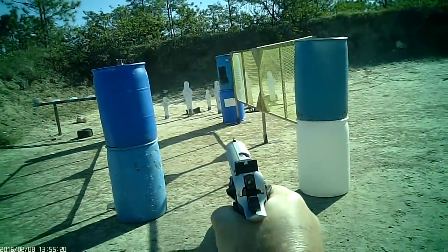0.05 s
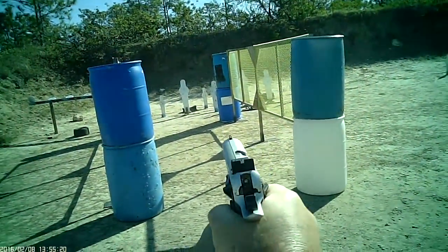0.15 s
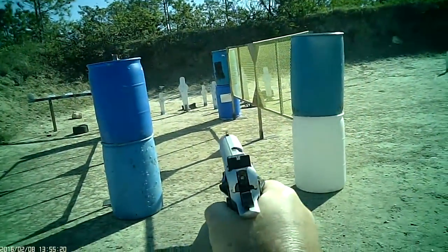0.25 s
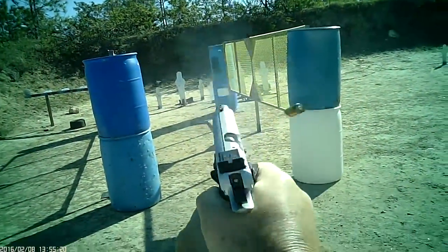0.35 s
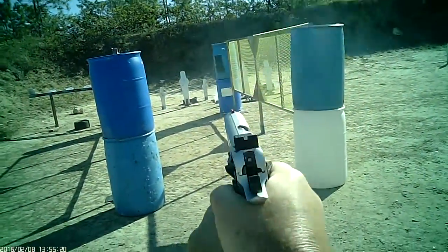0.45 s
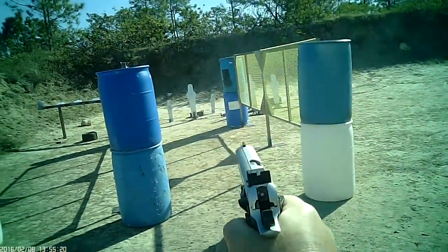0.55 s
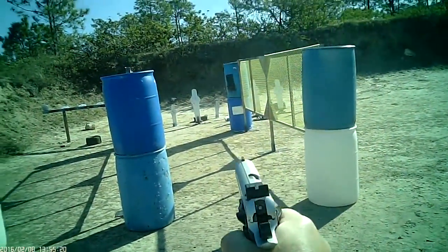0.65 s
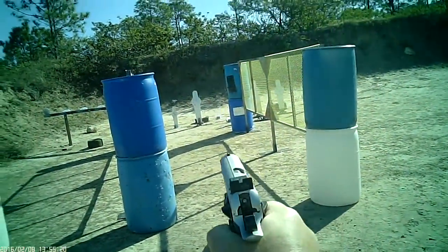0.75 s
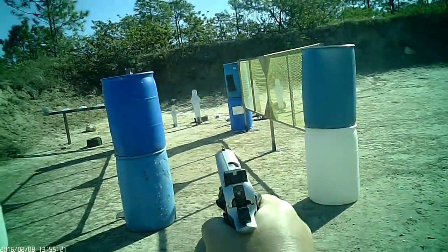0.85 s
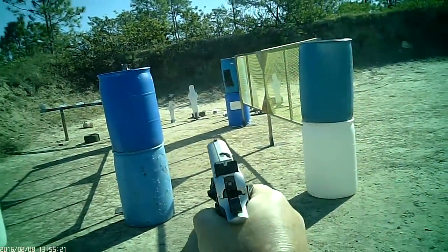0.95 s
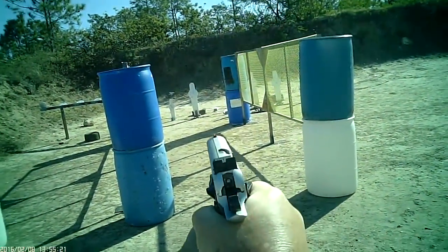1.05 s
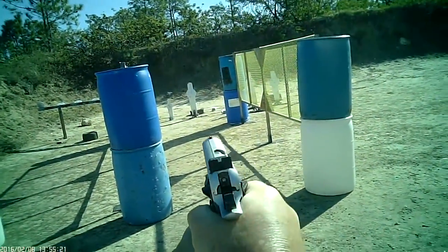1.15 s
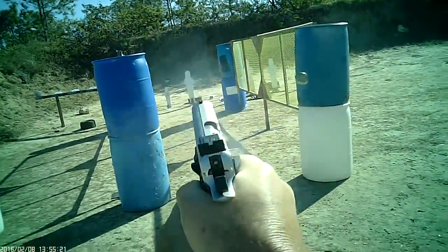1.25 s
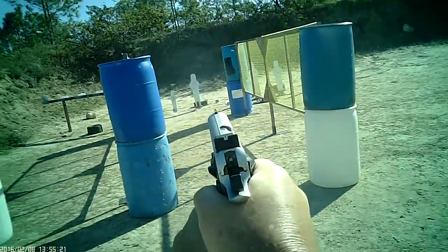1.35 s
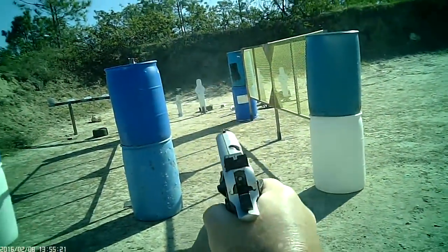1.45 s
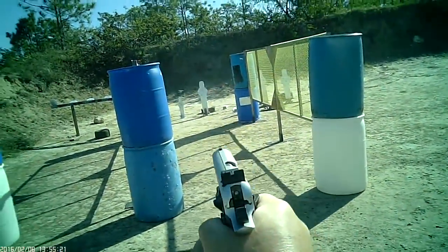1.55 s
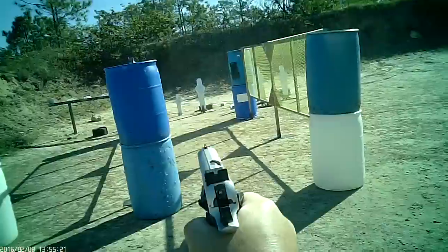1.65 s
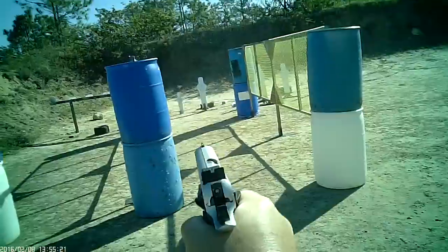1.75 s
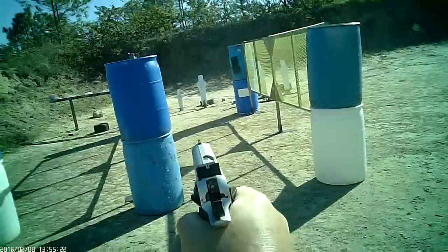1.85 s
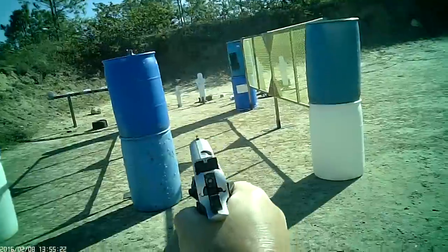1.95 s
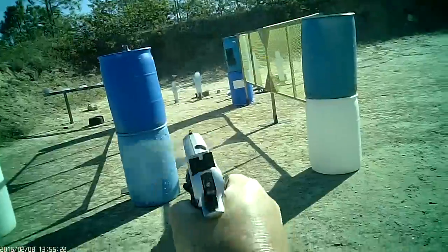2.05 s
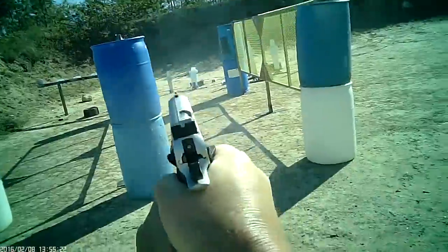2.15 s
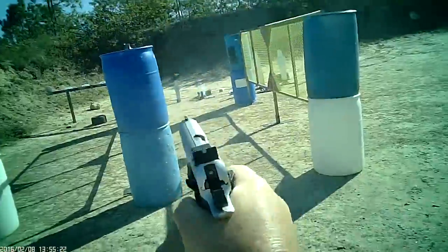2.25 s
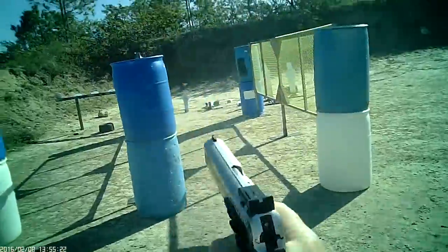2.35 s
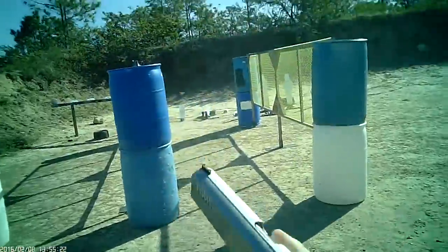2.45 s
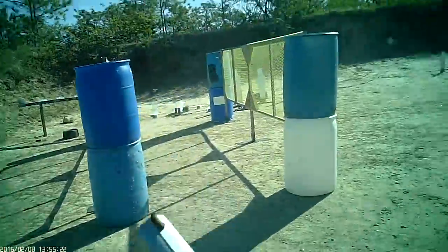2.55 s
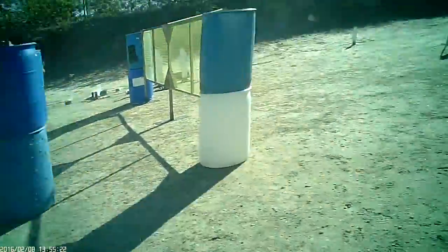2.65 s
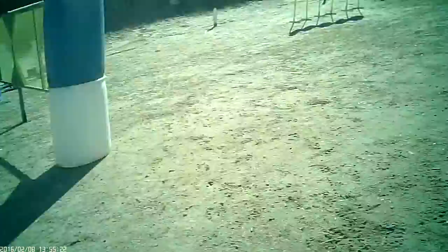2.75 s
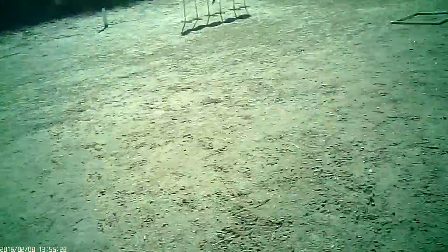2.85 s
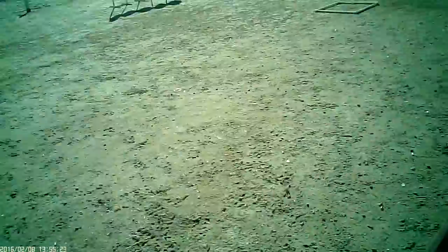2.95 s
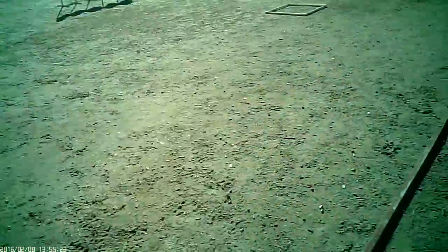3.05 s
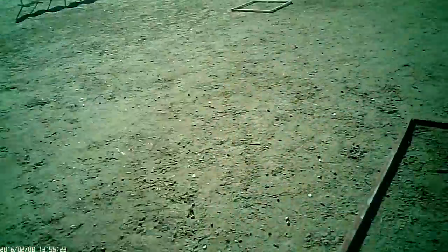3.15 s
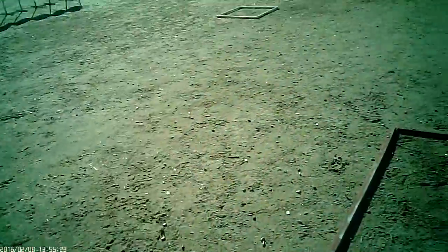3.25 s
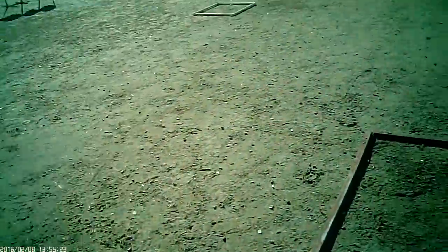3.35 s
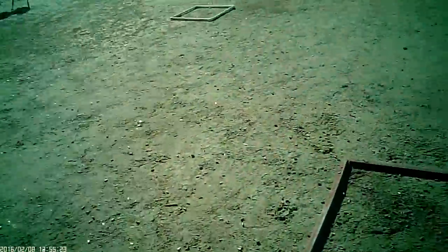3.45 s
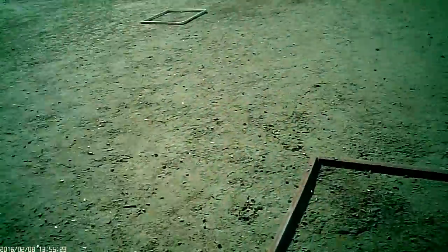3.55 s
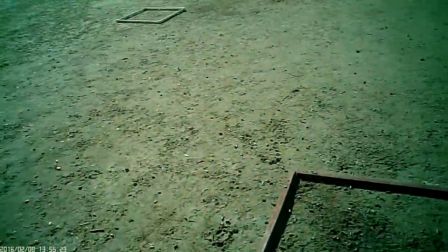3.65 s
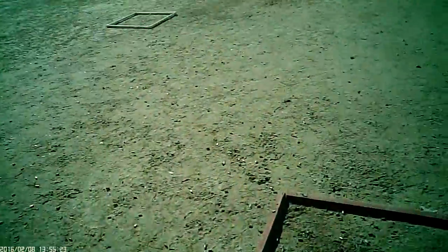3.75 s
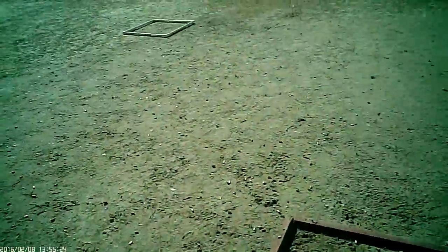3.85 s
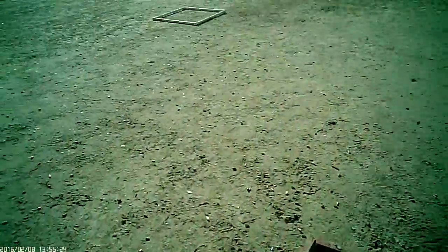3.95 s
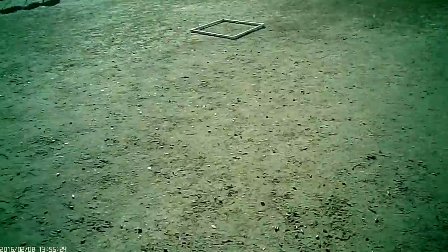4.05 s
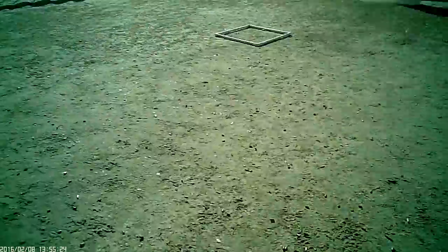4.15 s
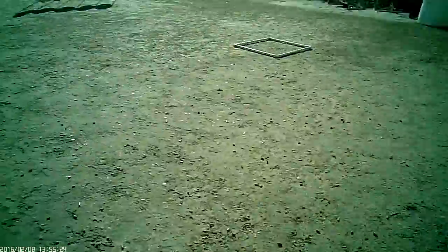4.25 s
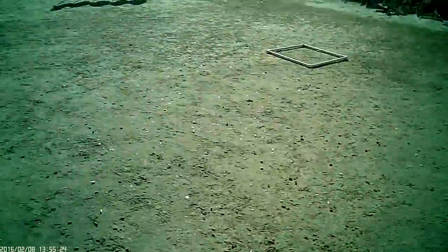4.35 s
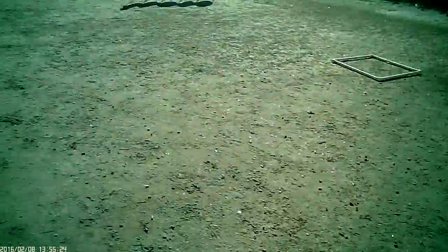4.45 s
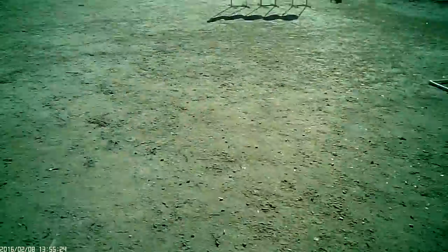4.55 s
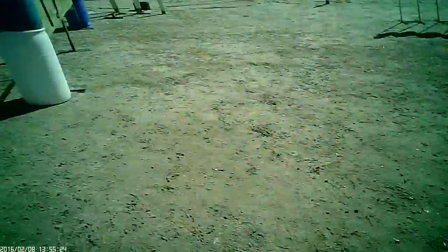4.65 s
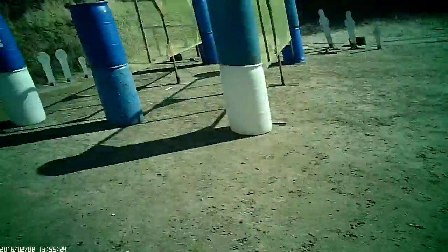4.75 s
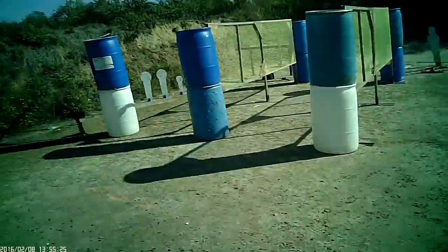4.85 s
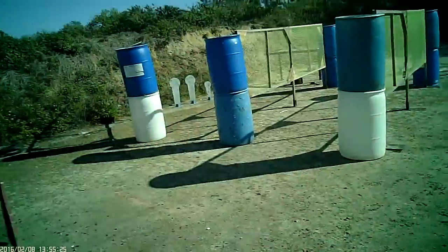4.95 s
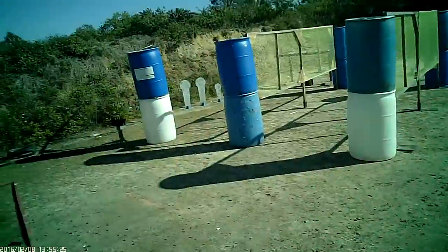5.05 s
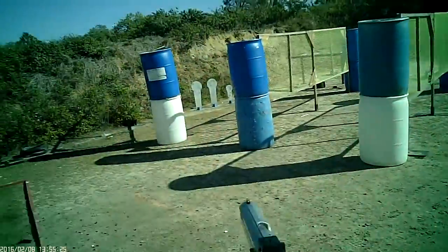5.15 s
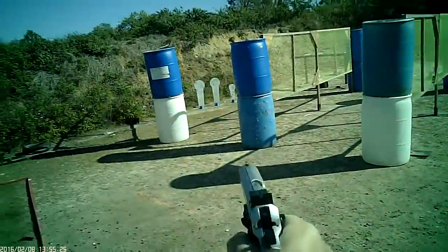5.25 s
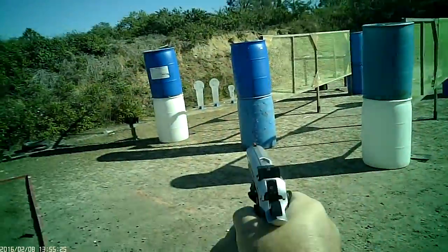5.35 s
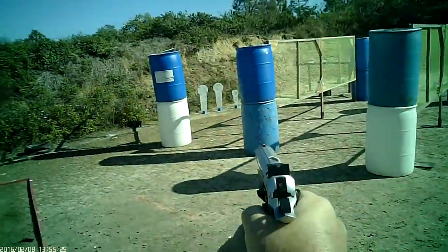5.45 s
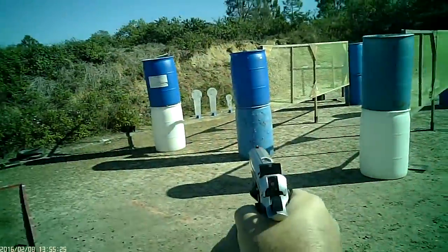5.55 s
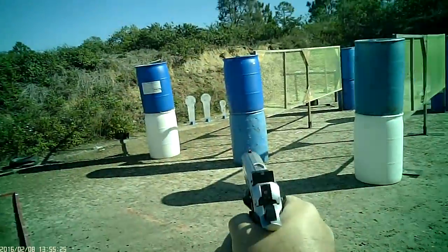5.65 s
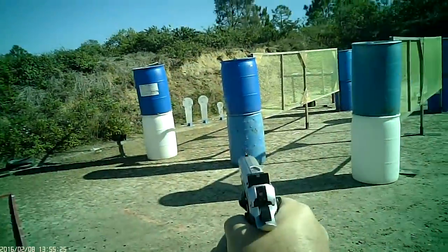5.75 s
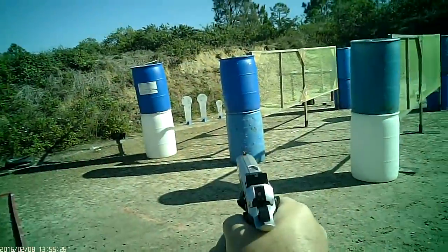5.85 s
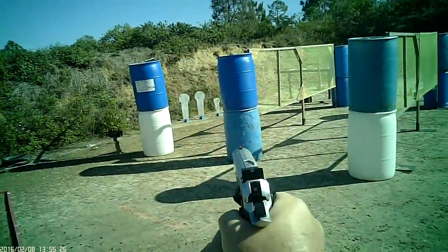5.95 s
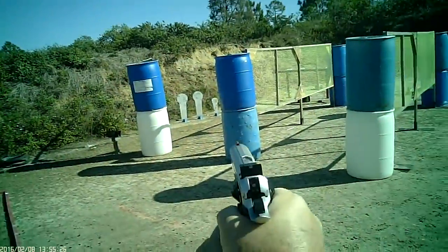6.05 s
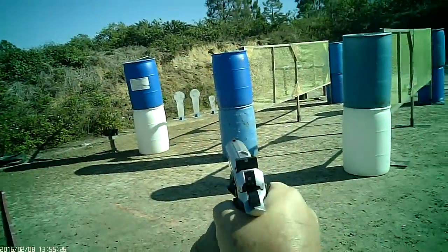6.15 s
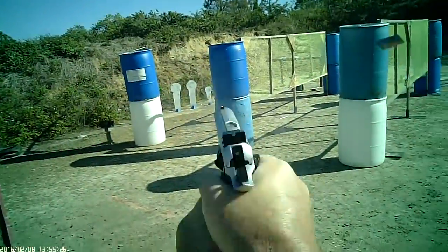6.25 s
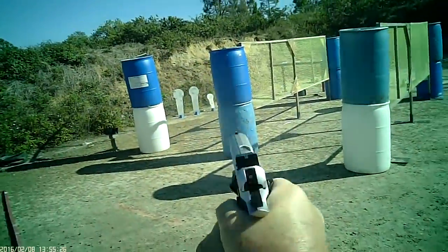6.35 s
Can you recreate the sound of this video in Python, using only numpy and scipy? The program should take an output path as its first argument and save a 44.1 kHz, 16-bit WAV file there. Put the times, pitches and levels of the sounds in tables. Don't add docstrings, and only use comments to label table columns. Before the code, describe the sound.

On an open dirt range in light wind, a pistol fires three times roughly a second apart. Each harsh blast echoes off drums and berm, and a bright steel clang follows almost at once. The first and third plates topple and clatter. Crunching steps fill a quieter gap before a fourth shot and metallic ring. The small head-worn microphone overloads and briefly ducks after each blast.

```python
import sys
import numpy as np
from scipy import signal
from scipy.fft import rfft, irfft, next_fast_len
from scipy.io import wavfile

SR = 44100
rng = np.random.default_rng(int(sys.argv[2]) if len(sys.argv) > 2 else 0)


def how_loud(loudness_db):
    steps = np.asarray(loudness_db, float) / 20
    return 10 ** steps


def transcribe(u):
    v = np.clip(np.atleast_2d(u).T, -1, 1)
    q = np.round(v * 32767).astype(np.int16)
    wavfile.write(sys.argv[1], SR, q)


N = 282681

# start in seconds, far echo in dB, stance (0 or 1), change of the late swell in dB.
SHOTS = [
    (0.361, -23.5, 0, 0),
    (1.246, -27.5, 0, -3),
    (2.0998, -22, 0, 2.5),
    (6.222, -22, 1, 0.1),
]
# start in seconds, peak in dB, ring against knock in dB,
# brightness in dB, pitch of the rap in Hz.
KNOCKS = [
    [(0.918, -28, -30, -40, 990), (0.925, -22.5, -8, -39, 1490), (0.9961, -28, -7.5, -6.5, 1570),
     (1.0544, -36, -14.5, -40, 1290), (1.0884, -32.5, -7, -36, 1320), (1.101, -45, -41, -30, 1680),
     (1.1075, -25, -23, -15, 1520), (1.1955, -31.5, -16.5, -33, 1420)],
    [(2.502, -36, -15, -47, 1550), (2.653, -34, -30, -2, 1420), (2.66, -22.5, -13.5, -5, 1490),
     (2.72, -49, -28, -30, 1420), (2.79, -39, -5.5, -32, 775), (2.867, -34, -7, -34, 880),
     (2.923, -29.5, -6, -42, 1470), (2.972, -18, -26, -45, 1490), (2.981, -24.5, -38, -45, 1560),
     (2.989, -31.5, -11, -40, 1600), (3.028, -48, -32, -40, 1700), (3.041, -30, -4.5, -34, 1490),
     (3.139, -28.5, -9, -39, 1550), (3.206, -25, -36, -35, 1580), (3.221, -30, -25, -38, 1620),
     (3.272, -38.5, -22, -27, 1530), (3.305, -38, -36.5, -30, 1230), (3.340, -42.5, -5, -35, 1500),
     (3.399, -44, -5, -44, 1600), (3.45, -36.5, -11, -18, 1500), (3.462, -44.5, -28, -20, 1620),
     (3.48, -40, -30, -22, 1480), (3.57, -45, -30, -24, 1580), (3.611, -41, -8.5, -18, 1710),
     (3.625, -40, -32, -22, 1370), (3.645, -44, -30, -20, 1390)],
]
# frequency in Hz, level in dB.
ECHO_COLOUR = [(60, -27.5), (150, -6.5), (400, -5), (900, 2), (1600, -1), (2300, -12.5), (5300, -16),
               (8000, -31), (16000, -55)]


def seconds(length):
    return np.arange(int(length * SR)) / SR


def add(out, piece, s):
    at = int(s * SR)
    out[at:at + len(piece)] += piece[:N - at]


def fade(t, t60):
    return how_loud(-60 * t / t60)


def coloured(spectrum, size):
    hz, db = np.transpose(spectrum)
    bins = np.linspace(1, SR / 2, size // 2 + 1)
    gain = how_loud(np.interp(np.log(bins), np.log(hz), db))
    x = irfft(rfft(rng.standard_normal(size)) * gain, size)
    return x / np.std(x)


def drift(rate, size):
    knots = rng.standard_normal(int(size / SR * 60) + 2)
    t = seconds(size / SR + 1)[:size]
    return np.interp(t * min(rate, 59), np.arange(len(knots)), knots)


def peak(x, hz, width, db):
    w, g = 2 * np.pi * hz / SR, how_loud(db / 2)
    q = np.pi * width / SR
    zeros = [1 + q * g, -2 * np.cos(w), 1 - q * g]
    poles = [1 + q / g, -2 * np.cos(w), 1 - q / g]
    return signal.lfilter(zeros, poles, x)


def resonance(x, hz, width):
    r = np.exp(-np.pi * width / SR)
    zeros = np.array([1, 0, -1]) * (1 - r * r) / 2
    return signal.lfilter(zeros, [1, -2 * r * np.cos(2 * np.pi * hz / SR), r * r], x)


def near(hz, mode_hz):
    return np.exp(-(np.log(hz / mode_hz) / .006) ** 2)


def ring(pitches, levels_db, t60, waver_db, length, hush=0.03, start=0, swings=()):
    t, out = seconds(length + 2 * hush), 0
    for hz, db, knots in zip(pitches, levels_db, rng.standard_normal((len(pitches), 80))):
        db = db + 3 * np.log2(hz / 1500)
        for s, mode_hz, lobe_db, half in swings:
            closeness = near(hz, mode_hz)
            if closeness > 1e-3:
                db = db + closeness * lobe_db * np.exp(-((t + start - s) / half) ** 2)
        turns = t * 18 * (1 + hz / 1e4)
        waver = how_loud(db + waver_db * (hz / 2500) ** .3 * np.interp(turns, np.arange(80), knots))
        beat_depth = np.clip(.04 * waver_db + hz / 2.5e4, 0, .9)
        beat = 1 + beat_depth * np.cos(2 * np.pi * (18 + 9 * knots[-2]) * t + 3 * knots[-3])
        muffled = np.clip((length - t) / hush + 2 - hz / 5000 + .25 * knots[-1], 0, 1) ** 2
        decay = fade(t, t60 * (1500 / hz) ** .27)
        out = out + waver * beat * muffled * decay * np.sin(2 * np.pi * hz * t)
    return out


def air():
    # frequency in Hz, level in dB per Hz.
    wind_colour = [(12, -13), (30, 0), (80, -2.5), (160, -10), (400, -15.5), (1000, -51)]
    rustle_colour = [(100, -9.5), (250, -9), (500, 3.5), (1400, 1.5), (2200, -7), (5000, -16), (12000, -34)]
    # centre in seconds, change in dB, half-length in
    # seconds.
    gusts = [
        (0, 5, 0.12),
        (.66, 14, 0.09),
        (1.52, -5, 0.094),
        (2.4, 13, 0.041),
        (2.68, 4, 0.3),
        (3.22, -2.5, 0.13),
        (3.43, 5, 0.071),
        (4.4, 2.5, 0.46),
        (5.851, -2, 0.23),
    ]
    t, size = np.arange(N) / SR, next_fast_len(N)
    gust_db = sum(db * np.exp(-((t - s) / half) ** 2) for s, db, half in gusts)
    wind = how_loud(-56 + gust_db + 0.53 * drift(6.3, N)) * coloured(wind_colour, size)[:N]

    floor_db, turn_db, linger_db, linger_t60_s = -61, -57.5, -33.5, 5
    turning = np.exp(-((t - 4.93) / 0.24) ** 2)
    power = how_loud(2 * floor_db) + how_loud(2 * turn_db) * turning
    knocked = np.zeros(N)
    for s, db, *_ in KNOCKS[0] + KNOCKS[1]:
        knocked[int(s * SR)] = how_loud(2 * (db + linger_db))
    power = power + signal.lfilter([1], [1, -fade(2 / SR, linger_t60_s)], knocked)
    rustle = np.sqrt(power) * how_loud(2.0 * drift(42, N)) * coloured(rustle_colour, size)[:N]
    return wind + rustle


def earlier_shot():
    # frequency in Hz, level in dB.
    last_modes = [(2536, -66), (2649, -62), (2859, -65), (3903, -68), (4958, -71)]
    out, t = np.zeros(N), seconds(1.4)
    add(out, how_loud(-48) * fade(t, 2.5) * coloured(ECHO_COLOUR, len(t)), 0)
    add(out, ring(*np.transpose(last_modes), t60=1.5, waver_db=1.5, length=0.3, hush=.05), 0)
    return out


def thumps():
    # start in seconds, peak in dB, pitch in Hz.
    blows = [(0.035, -34.5, 176), (.478, -15, 230), (0.573, -17, 366), (0.576, -17, 133), (0.691, -24, 278),
             (0.92, -21.5, 252), (2.215, -16, 260), (2.362, -15.5, 224), (2.495, -35, 250),
             (2.657, -29, 287), (2.794, -30.5, 213), (3.064, -37, 215), (3.433, -32.5, 185),
             (3.809, -38.5, 208), (3.855, -39, 148), (4.166, -42.5, 170), (4.498, -45, 154),
             (5.006, -37, 78.5)]
    out, t = np.zeros(N), seconds(.2)
    for s, db, hz in blows:
        add(out, how_loud(db) * np.sin(2 * np.pi * hz * t) * np.clip(t / 0.0013, 0, 1) * fade(t, 0.04), s)
    return out


def muzzle_blast():
    t = seconds(0.061)

    def pulse(centre, half, power=2):
        return np.exp(-((t - centre) / half) ** power)

    tones = 0.9 * np.sin(2 * np.pi * 6500 * t) + 0.66 * np.sin(2 * np.pi * 9500 * t)
    whistle = tones + 1.1 * rng.standard_normal(len(t))
    whistle = .9 * (.1 + (t / .0018) ** 2) * pulse(0, .003, 4) * whistle
    hz = 500 + 9000 * np.exp(-t / 0.0015)
    slide = np.sin(2 * np.pi * np.cumsum(hz) / SR + rng.uniform(0.012, 0.67))
    slide = 4.0 * pulse(.0034, .0012) * slide
    push = 1.6 * pulse(.0047, .001) + .3 * pulse(.0065, .0015)
    suction = 1.0 * pulse(.0113, .0024, 4) + .15 * pulse(.009, .001) + .4 * pulse(.0012, .0006)
    rebound = .2 * np.clip((t - .0135) / .002, 0, 1) * np.exp(-(t / .028) ** 3)
    bounce = 3.5 * pulse(.0099, .00025, 4)
    return whistle + slide + bounce + push - suction + rebound


def near_echoes(reflectors):
    t = seconds(0.36)
    scatter = .075 * rng.standard_normal(len(t)) * how_loud(5 * drift(59, len(t)))
    scatter = scatter * fade(t, .3) * (t > .004)
    clicks, high = .42 * scatter, .8 * scatter
    face_s, face_loss_db = .0017, 3
    for (s, db, depth, high_db), chance in zip(reflectors, rng.standard_normal((len(reflectors), 8))):
        face = np.arange(min(1 + int(max(depth, 0) / face_s), 8))
        uneven = .15 * chance[::-1][face] * (face > 0)
        at = ((s + face_s * (face + uneven)) * SR).astype(int)
        strength = how_loud(db - face_loss_db * face + 1.5 * chance[face])
        clicks[at] += strength
        high[at] += strength * how_loud(high_db)
    dulling = signal.butter(3, 2300, fs=SR, output="sos")
    dull, high = signal.sosfilt(dulling, [clicks, high])
    body = 26.1 * resonance(resonance(dull, 870, 520), 830, 950)
    body = body - 14.0 * resonance(resonance(high, 1600, 300), 1600, 660)
    body = body + 20.0 * resonance(dull, 430, 150)
    body = peak(body, 1230, 290, -7)
    bright = 1.9 * resonance(scatter, 3300, 3500) + 1.8 * scatter * fade(t, 0.12)
    return bright + body + 1.3 * resonance(clicks * fade(t, 0.08), 3600, 2800)


def far_echo(t, swell_db):
    ground = how_loud(8.5 - 69.5 * t)
    berm = how_loud(-7 + swell_db) * np.exp(-.5 * ((t - 0.29) / 0.093) ** 2)
    trees = how_loud(-7 - 32 * t)
    rise = np.clip(t / 0.058, 0, 1) ** 2
    return rise * np.sqrt(ground ** 2 + berm ** 2 + trees ** 2)


def shots():
    # delay after the shot in seconds, level in dB, depth in seconds, upper ring in dB.
    reflectors = [
        [(.0046, -3.5, 0.0014, -0.5), (.0108, -6, .002, 1), (.0202, -4, .0036, 15.5), (.0243, 10, 0.0015, -4.5),
         (.0285, 6.5, 0, -3), (.0318, -6, 0.0048, -3), (.0352, 3, 0, -5), (.041, 0.5, 0, -3),
         (.0495, -7, 0.0052, -2.5), (.0553, 7, 0.0029, -8), (.0695, -6.5, .004, 12), (.085, -9, 0.013, -1),
         (.113, -14, 0.0035, 5)],
        [(.0046, -4, 0, 0), (.0102, 6, 0, -10.5), (.0255, 0, 0.0083, 3.5), (.0336, 8.5, 0.00068, -7),
         (.0398, 6.5, 0, -0.5), (.0462, 1.5, 0.0022, -1), (.0505, -0.5, 0.0048, -2), (.0605, -4, 0.008, 4),
         (.067, -7, 0, -5), (.078, -4, 0.00072, -1), (.113, -14, 0.024, 11)],
    ]
    # delay after the shot in seconds, level in dB.
    slide_ticks = [(0.0594, 1), (.061, -4.5), (.066, -11.5)]
    # delay after the shot in seconds, level in dB.
    low_echoes = [
        (0.055, -20.5),
        (0.119, -24.5),
    ]
    out, t = np.zeros(N), seconds(1.4)
    click = 1. * (t[:400] == 0)
    tick = resonance(resonance(click, 10000, 1500), 10000, 3000)
    low_push = np.sin(2 * np.pi * 175 * t) * fade(t, 0.048)
    for s, far_db, stance, swell_db in SHOTS:
        lumps_db = 1.7 * drift(50, len(t))
        add(out, muzzle_blast(), s - .0008)
        add(out, near_echoes(reflectors[int(round(stance))]), s)
        add(out, how_loud(far_db + lumps_db) * far_echo(t, swell_db) * coloured(ECHO_COLOUR, len(t)), s)
        for after, db in slide_ticks:
            add(out, how_loud(db) * tick, s + after)
        for after, db in low_echoes:
            add(out, how_loud(db) * low_push, s + after)
    return out


def strikes():
    strike_s = [.4377, 1.3157, 2.1712, 6.2905]
    # ring in dB, splash in dB, decay t60 in seconds, seconds until the falling plate turns away.
    blows = [
        (-25, -8.5, 1.86, 0.31),
        (-10.5, -3.5, 1.217, 1.6),
        (-29, -9.5, 2.17, 0.32),
        (-31, -10, 3.8, .91),
    ]
    # frequencies in Hz, then levels in dB.
    plate_hz = [
        [1174, 1677, 2078, 2229, 2490, 2815, 3208, 3580, 3688, 4043, 4646, 5300, 5798, 6032, 6204, 6581, 6982,
         7311, 7445, 8971, 9695, 9865, 10255, 10651, 10845, 11367, 12775, 13614, 14212, 14470],
        [1437, 5289, 6955, 7224, 7730, 8885, 9135, 9281, 9515, 9822, 10532, 10971, 13779, 14104],
        [1192, 1577, 2105, 2261, 2525, 2853, 2988, 3243, 3418, 3725, 3919, 4075, 4791, 5351, 5860, 6325, 6670,
         7004, 7531, 8433, 9598, 10403, 10802, 11415, 12468, 12950, 13722, 14118, 14258, 14567],
        [2767, 2964, 3114, 3505, 4121, 4850, 5149, 6110, 6403, 6608, 6885, 7192, 7499, 8040, 8438, 9257, 9908,
         10446, 10683, 11184, 12260, 12764, 13068, 13625, 13940, 14425],
    ]
    plate_db = [
        [-1.5, -9, -14, -17, -10.5, -12, -16.5, -18, -12, -8, -22, -18, -27, -24, -26, -17.5, -25.5, -29, -28,
         -23.5, -30.5, -35, -32, -27.5, -34, -36, -36, -39, -38, -40],
        [0.5, -30.5, -45, -34.5, -48, -53, -51, -49, -38, -49.5, -51.5, -49, -53, -50],
        [-4, -4, -3.5, -21, -6.5, -12, -15, -14.5, -17, -9.5, -15.5, -9, -15, -12.5, -21, -20, -8, -21, -21,
         -22, -20.5, -27, -21.5, -33, -35, -33, -27.5, -37.5, -30, -29],
        [-7.5, -7.5, 2.5, -10, -12.5, -17.5, -7.5, -18, -14, -10.5, -19, -24, -15, -31, -21, -20, -19, -18.5,
         -26, -18, -24.5, -29, -24, -25, -21, -24],
    ]
    # centre in seconds, mode in Hz, change in dB, half-length in seconds.
    swings = [(0.456, 1677, 12, 0.034), (0.581, 1677, 14.5, 0.039), (0.39, 2000, -6, .04),
              (.63, 2229, 16, 0.058), (0.74, 2229, -12, 0.043), (0.47, 2490, 7.5, .04),
              (.455, 3688, 3, 0.02), (0.73, 3688, -22, 0.04), (.455, 4043, 6, .025), (0.75, 4043, -6, 0.04),
              (0.43, 4646, -12, 0.091), (0.75, 5300, -7, .08), (0.59, 6581, -10, 0.021),
              (.45, 6982, 16.5, 0.012), (.64, 6982, 18, 0.016), (0.69, 9695, 14, 0.065),
              (0.704, 10651, 13, .04), (0.70, 1174, 7, 0.1), (1.33, 1437, -5.5, 0.043),
              (1.37, 5289, 13, 0.057), (1.53, 7224, 1, 0.034), (1.643, 9515, 13, 0.056),
              (1.2, 9822, 32, .05), (2.39, 1192, 14, 0.087), (2.31, 1577, -11, 0.036),
              (2.51, 1577, 15, 0.054), (2.42, 2700, 19.5, 0.17), (2.32, 3725, 3, .06),
              (2.41, 3919, 9, 0.018), (2.19, 4075, 7, 0.028), (2.35, 4075, 5, .04), (2.46, 5351, 8, 0.034),
              (2.185, 7700, 12.5, 0.029), (2.185, 7004, 16.5, .02), (2.185, 6900, 10.5, .02),
              (6.37, 5149, 9.5, 0.046), (6.30, 3114, -14, .015), (6.31, 2964, 7, .03),
              (6.31, 6403, -3, 0.038), (6.34, 11184, 1, .03), (6.33, 4121, 4, 0.031), (6.33, 6110, 7, .04),
              (0.71, 4646, 12, 0.046), (0.64, 2490, 5.5, 0.084), (2.37, 6670, -8, 0.11),
              (2.22, 7531, -3, .06), (0.54, 4043, -5, .03), (2.43, 1577, 17, 0.009), (2.25, 5351, 8, .02)]
    waver_db, minor_modes = [1.0, .6, 1.0, .8], [44, 0, 44, 24]
    out, t = np.zeros(N), seconds(.2)
    for k, (s, (ring_db, splash_db, t60, turns_away)) in enumerate(zip(strike_s, blows)):
        minor_hz = rng.uniform(1800, 15000, minor_modes[k])
        minor_db = np.interp(minor_hz, plate_hz[k], plate_db[k]) - 3
        hz, db = np.append(plate_hz[k], minor_hz), np.append(plate_db[k], minor_db)
        length = min(turns_away, N / SR - s + .2)
        rung = ring(hz, db, t60, waver_db[k], length, hush=0.06, start=s, swings=swings)
        add(out, how_loud(ring_db) * rung, s)
        crack = fade(t, .018) + 0.14 * fade(t, 0.32)
        add(out, how_loud(splash_db) * resonance(rng.standard_normal(len(t)), 3100, 7000) * crack, s)
    return out


def clatter():
    # frequencies in Hz, then levels in dB.
    fallen_hz = [
        [877, 1176, 1680, 2081, 2231, 2495, 2770, 3214, 3367, 3701, 4059, 4336, 4648, 4829, 5582, 6218, 6988,
         8775, 9426, 9733, 10287, 10885],
        [888, 1192, 1253, 1505, 1693, 2105, 2258, 2522, 2805, 2985, 3243, 3413, 3612, 4379, 4692, 4953, 5472,
         5709, 6272, 6648, 6861, 7055],
    ]
    fallen_db = [
        [-9.5, -11, 1.5, -17, -11.5, -22, -15, -23, -21.5, -15.5, -25.5, -24, -27, -26.5, -35, -31, -26.5, -32,
         -35.5, -39, -37.5, -42],
        [-14, -10.5, -3.5, -9, -0.5, -13.5, -12, -14, -22, -26, -22.5, -33, -34, -34, -29, -33, -35, -40.5, -38,
         -37, -31, -42],
    ]
    stifled = [1.069, 1.17, 1.248, 2.558, 2.915, 3.284, 3.445, 3.585, 3.67]
    # knock in seconds, mode in Hz, change in dB.
    accents = [(.924, 877, 0.5), (.924, 1176, 1), (.924, 3367, -4), (.996, 3701, 6), (.996, 2231, 10.5),
               (.996, 3214, 12), (.996, 1680, -25), (.996, 3367, 8), (1.054, 1176, 22), (1.054, 877, 14),
               (1.088, 1176, 8), (1.088, 1680, -20), (1.107, 3701, 9), (2.66, 1192, -14), (2.66, 1253, -11),
               (2.66, 1505, -13), (2.66, 2258, 7), (2.66, 2105, 8), (2.72, 2258, 3), (2.66, 2805, 6),
               (2.923, 4379, 8), (2.923, 2522, 1), (2.72, 1192, -13), (2.79, 1192, -2), (2.79, 2258, -13),
               (2.79, 888, 16), (2.867, 1192, -1), (2.867, 2258, -6), (2.923, 1253, 4.5),
               (2.923, 1192, -10), (2.973, 1253, 11), (2.973, 1192, 17), (2.973, 3243, 10),
               (2.973, 2985, 11), (3.041, 2258, 8), (3.041, 2805, 4), (3.041, 3243, 5), (3.041, 3612, 12.5),
               (3.041, 1253, 3.5), (3.139, 2105, 7), (3.139, 2985, 14), (3.139, 1192, 11.5),
               (3.139, 2258, -1), (3.221, 1253, 14), (3.221, 2522, 0), (3.399, 1192, 18), (3.45, 1192, 8),
               (3.45, 1693, -13), (3.611, 1192, 9), (2.973, 4692, 2), (3.041, 4953, 11), (3.041, 5709, 16),
               (3.206, 5472, -2), (2.973, 5709, 8), (3.611, 2805, 14), (3.45, 2805, 10)]
    out, t = np.zeros(N), seconds(.12)
    dulling = signal.butter(2, 2800, fs=SR, output="sos")
    for knocks, hz, levels_db in zip(KNOCKS, fallen_hz, fallen_db):
        hz, levels_db = np.array(hz), np.array(levels_db)
        for s, db, ring_db, bright_db, rap_hz in knocks:
            grit = rng.standard_normal(len(t)) * np.clip(t / 0.0029, 0, 1) * np.exp(-(t / .015) ** 2)
            rap = 10.0 * resonance(resonance(grit, rap_hz, 300), rap_hz, 640)
            rap = rap + 0.53 * resonance(grit, 2400, 1900)
            rap = rap + 2.2 * resonance(grit, 970, 450) + 0.22 * resonance(grit, 420, 190)
            rap = signal.sosfilt(dulling, rap)
            rap = 2.83 * rap / np.abs(rap).max()
            edge = how_loud(bright_db) * resonance(resonance(grit, 6000, 3800), 6160, 5100)
            add(out, how_loud(db - 5.5) * (rap + edge), s - .003)

            mode_db = levels_db + 1.5 * rng.standard_normal(len(hz)) * (levels_db < 0)
            for at, mode_hz, accent_db in accents:
                if abs(at - s) < .005:
                    mode_db = mode_db + near(hz, mode_hz) * accent_db
            mode_db = mode_db - 2.5 * np.log2(np.maximum(hz / 1700, 1))
            end = min(stop for stop in stifled if stop > s)
            rung = ring(hz, mode_db, t60=0.83, waver_db=1.2, length=end - s)
            attack = np.clip(np.arange(len(rung)) / SR / 0.0046, 0, 1)
            add(out, how_loud(db + ring_db) * rung * attack, s - .002)
    return out


def footsteps():
    # start in seconds, peak in dB.
    steps = [(3.491, -21), (3.536, -27), (3.631, -26), (3.814, -28), (3.845, -20.5), (3.861, -40),
             (3.897, -26.5), (4.242, -23), (4.271, -23), (4.717, -22.5), (4.844, -33), (4.9, -42),
             (4.96, -36), (5.03, -36), (5.09, -40), (5.144, -33), (5.199, -29)]
    out, t = np.zeros(N), seconds(.2)
    for s, db in steps:
        grit = rng.standard_normal(len(t)) * np.clip(t / 0.0087, 0, 1) * np.exp(-t / 0.022)
        crunch = resonance(grit, 1340, 610) + 0.021 * resonance(grit, 2300, 2600)
        add(out, how_loud(db - 9.0) * crunch, s - .004)
    return out


def frame_settling():
    # frequency in Hz, level in dB.
    frame = [(495, -3), (1340, 7), (1750, -8), (2550, -17)]
    # start in seconds, level in dB, decay t60 in seconds.
    rocking = [(3.975, -46.5, 0.42), (4.114, -45, 0.14), (4.15, -42, 0.1), (4.184, -39, 0.12),
               (4.272, -25, 0.059), (4.30, -38, 0.091), (4.395, -46, 0.34), (4.456, -50, 0.07)]
    out, t = np.zeros(N), seconds(0.29)
    for s, db, t60 in rocking:
        rub = rng.standard_normal(len(t)) * fade(t, t60) * np.clip(t / 0.007, 0, 1)
        modes = sum(how_loud(db + mode_db) * resonance(rub, hz, 48) for hz, mode_db in frame)
        add(out, 5.0 * modes, s - .006)
    return out


def scene():
    plates = strikes() + clatter() + frame_settling()
    return (air() + earlier_shot() + thumps() + shots() + plates + footsteps())[None]


def top_cut(x):
    return signal.sosfilt(signal.butter(12, 17080, fs=SR, output="sos"), x)


def record(dry):
    # frequency in Hz, width in Hz, change in dB.
    port = [(6970, 1000, 4.5), (8075, 460, -17.5), (10300, 1200, 3.5)]
    duck_db, duck_s = -10.5, np.array([.03, .14, .2, .47])
    x = dry
    for hz, width, db in port:
        x = peak(x, hz, width, db)
    x = x + how_loud(-60.5) * rng.standard_normal(x.shape)
    x = x / (1 + np.abs(x / .7) ** 6) ** (1 / 6)
    t = np.arange(N) / SR
    gain_db = sum(np.interp(t, s + duck_s, [0, duck_db, duck_db, 0]) for s, *_ in SHOTS)
    band_limit = signal.cheby2(12, 80, 17000, fs=SR, output="sos")
    x = signal.sosfilt(band_limit, x * how_loud(gain_db))
    x = x / (1 + np.abs(x / .9) ** 10) ** .1
    return top_cut(x - .0073)


dry = scene()
out = record(dry)
transcribe(out)
```